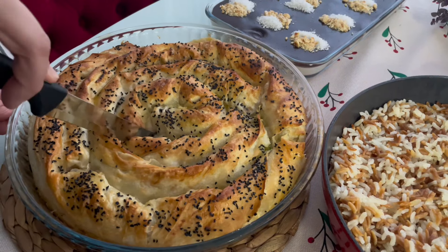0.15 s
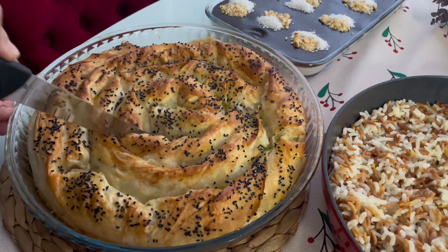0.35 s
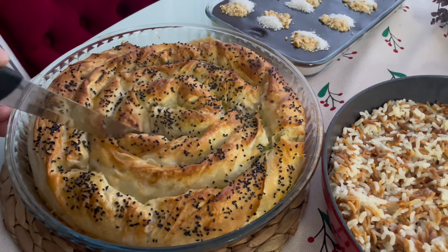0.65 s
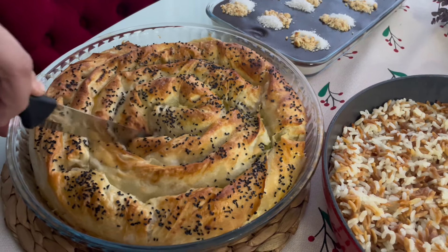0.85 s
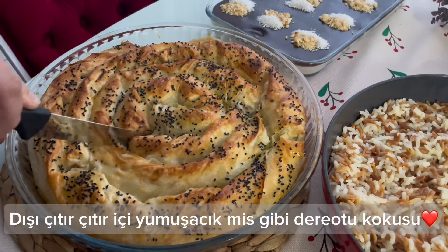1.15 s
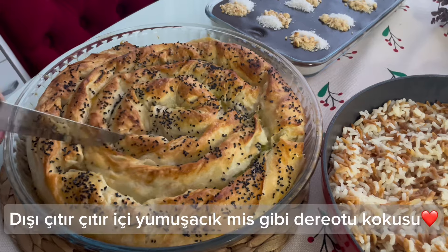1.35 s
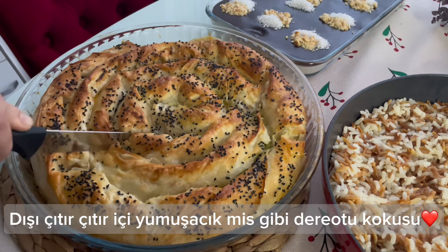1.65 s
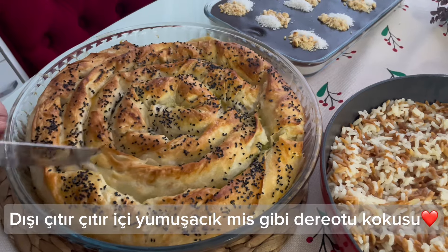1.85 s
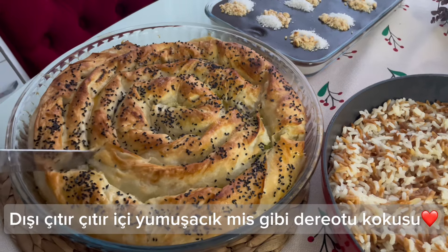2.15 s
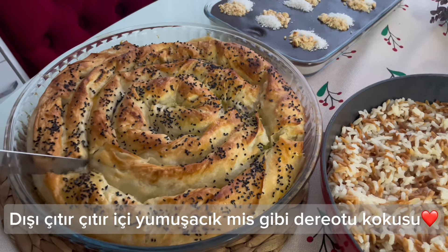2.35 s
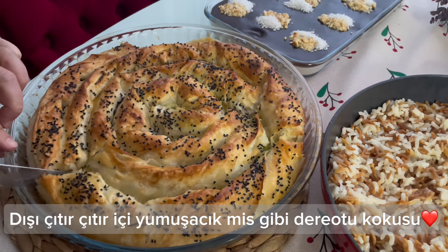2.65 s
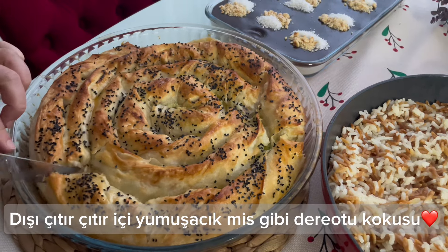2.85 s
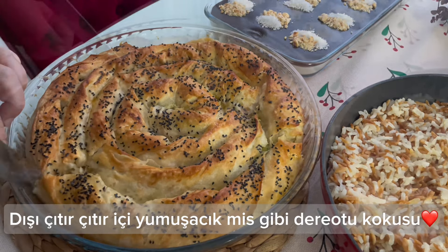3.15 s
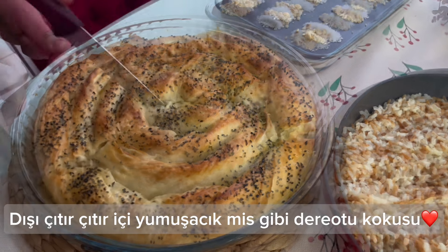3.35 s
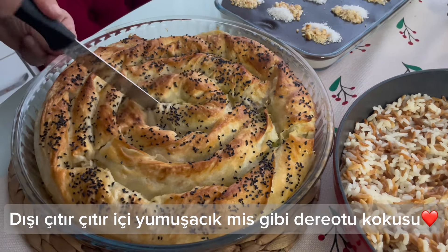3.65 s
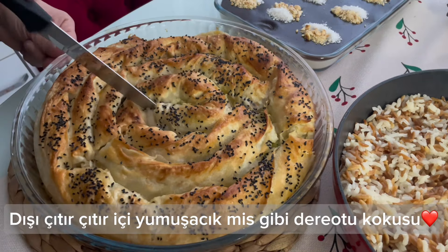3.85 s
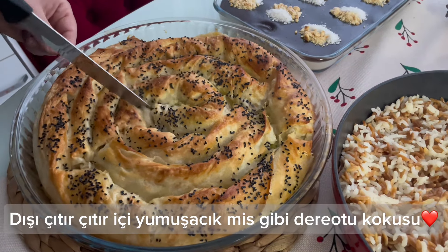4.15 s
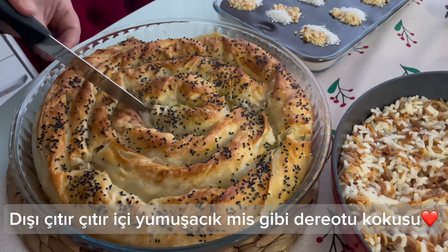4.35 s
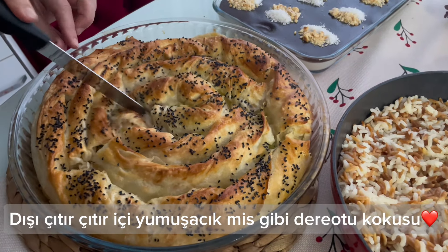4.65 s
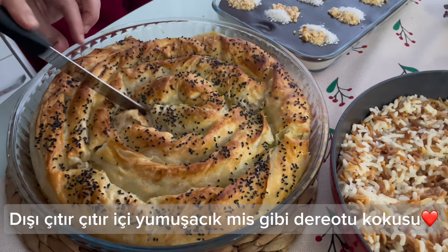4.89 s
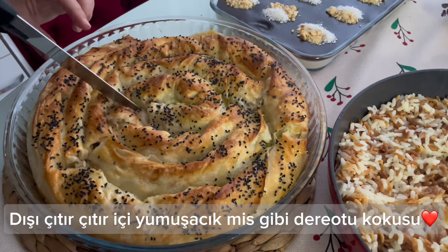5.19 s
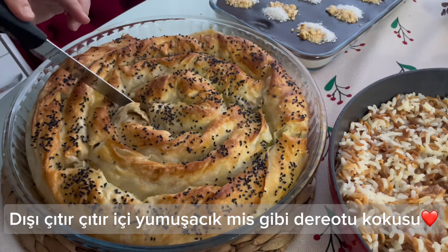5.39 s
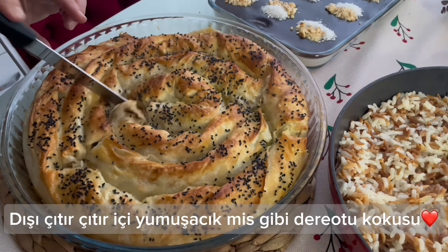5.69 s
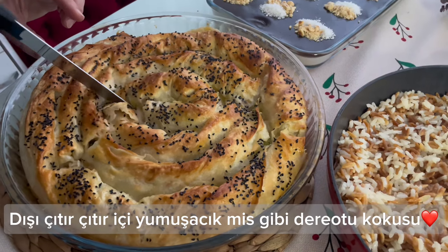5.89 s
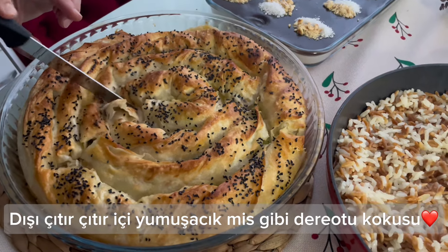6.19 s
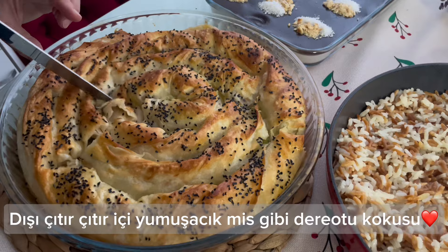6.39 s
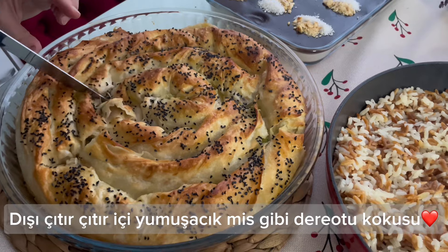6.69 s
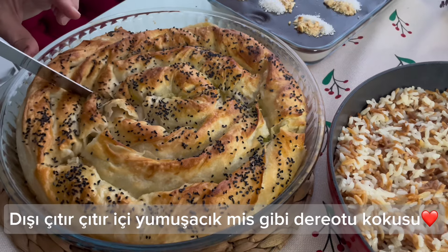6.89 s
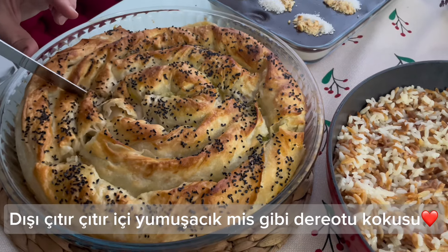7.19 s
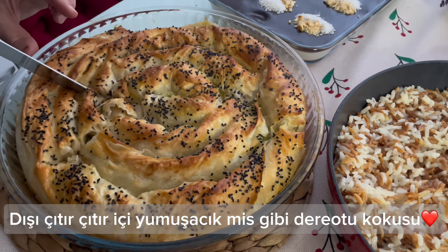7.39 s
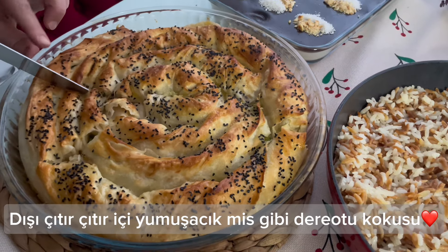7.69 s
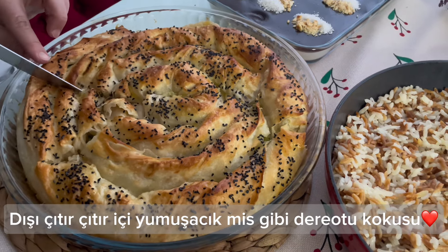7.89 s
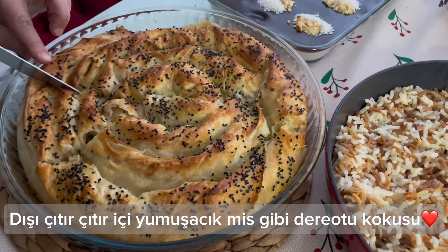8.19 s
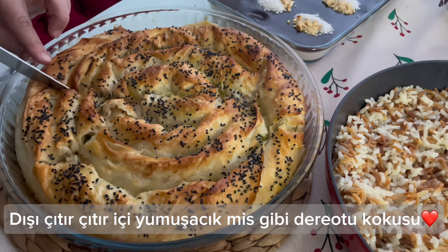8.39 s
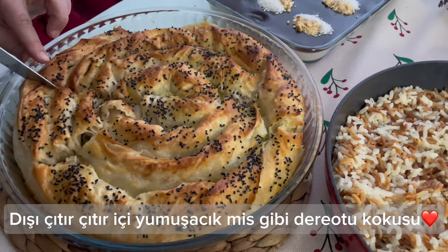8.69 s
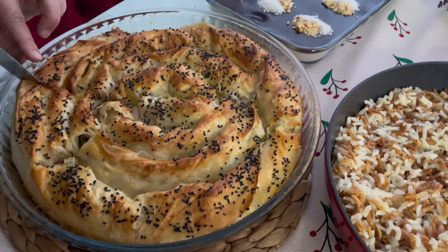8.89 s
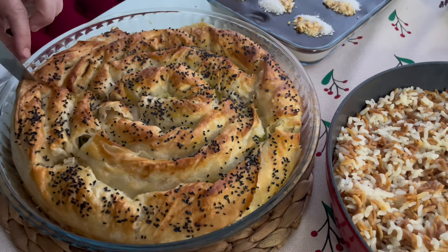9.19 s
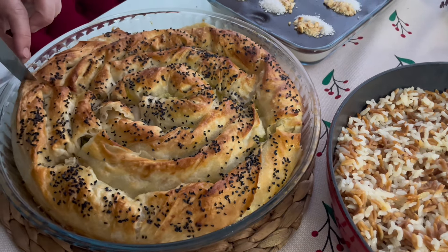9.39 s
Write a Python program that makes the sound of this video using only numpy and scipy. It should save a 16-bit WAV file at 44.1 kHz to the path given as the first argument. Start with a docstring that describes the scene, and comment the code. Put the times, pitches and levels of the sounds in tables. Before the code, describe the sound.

Close, dry crunching as a blade cuts flaky baked pastry in short paired strokes, thudding against a glass dish in a quiet small kitchen.

```python
"""A long knife saws through crisp layered pastry in a glass dish on a kitchen table, close to two microphone ports.
Strokes are crackle noise shaped by blade speed, with bursts of small flakes; large flakes snap as short noise bursts.
The blade knocks on the dish as falling chirps with steel ring and table boom; at the rim it chatters and clinks as
damped modes plus gritty noise, and light tip taps ring the dish. A small room answers over faint air and mains hum."""
import sys
import numpy as np
from scipy import signal
from scipy.fft import rfft, irfft, next_fast_len
from scipy.io import wavfile
from scipy.ndimage import uniform_filter1d, map_coordinates

SR = 44100
rng = np.random.default_rng(int(sys.argv[2]) if len(sys.argv) > 2 else 0)


def wav_out(sig):
    """Save sig, one row per channel (or a flat mono array), as 16-bit PCM at SR to the path in sys.argv[1]."""
    wavfile.write(sys.argv[1], SR, np.round(np.clip(np.atleast_2d(sig).T, -1, 1) * 32767).astype(np.int16))


N = 420713

# time axis of a short sound in seconds, contact at 0; AGE is the time since contact
HIT = np.arange(-512, 7680) / SR
AGE = np.maximum(HIT, 0)
HIT_HZ = np.fft.rfftfreq(len(HIT), 1 / SR)

# Saw cycles, a draw back then a push. Each row: push start in seconds, draw length in seconds,
# push length in seconds, draw level in dB, push level in dB.
STROKES = [(0.074, 0.067, .14, -52, -44), (.419, .14, .11, -52.5, -40), (0.741, .14, 0.13, -48.5, -43),
           (1.073, 0.14, 0.13, -49.5, -46.5), (1.489, 0.21, 0.13, -56, -53), (1.96, 0.28, .14, -63, -47),
           (2.391, 0.22, 0.098, -47.5, -52), (2.729, 0.16, .11, -50, -43), (3.201, 0.12, .11, -58, -43),
           (3.537, 0.15, .13, -48, -47), (3.853, 0.15, 0.15, -55, -49), (4.186, 0.18, 0.13, -56.5, -48),
           (4.497, 0.14, 0.14, -55, -53), (4.81, 0.12, 0.14, -52.5, -53), (5.264, 0.15, 0.11, -59, -50.5),
           (5.66, .18, 0.062, -60.5, -48), (6.035, .19, 0.13, -60.5, -50), (6.405, 0.17, .14, -53.5, -51.5),
           (6.772, 0.17, .14, -56.5, -48.5), (7.159, 0.15, 0.17, -55.5, -50),
           (7.552, 0.15, 0.13, -50, -47.5), (7.975, 0.29, .12, -55.5, -54.5),
           (8.309, 0.13, .12, -54.5, -57), (8.579, 0.1, 0.1, -50.5, -58.5), (8.974, 0.046, 0.1, -66, -54),
           (9.457, 0.12, 0.23, -53, -55)]
# Crust along the cut. Each row: time in seconds, hollow body offset in dB, dry fizz offset in dB.
PASTRY = [(0, -0.5, -6), (.7, -3, 0), (1.2, 6.5, -9.5), (2.2, -1, -5.5), (2.8, 5, -20), (3.3, 2.5, -17),
          (3.85, -5, -10.5), (4.4, 6, -5.5), (5.6, 2, -6), (6.1, 1.5, -10), (6.8, 5, -4.5), (7.6, 7.5, -3),
          (8.3, 3.5, -5), (8.55, -0.5, -22), (9, 4, -9), (9.4, -13, -19)]
# Spectrum of the crumbling crust. Each row: frequency in Hz, relative level in dB per Hz.
CRUST_SPECTRUM = [(47, -53), (80, -4.5), (163, 2), (436, -3), (744, 7.5), (1110, 0.5), (1810, -6),
                  (1980, -15), (5290, -18.5), (6470, -26), (7230, -68.5), (8450, -30), (9660, -29.5),
                  (12600, -34.5), (16500, -64)]
# Spectrum of small flakes inside the cut. Each row: frequency in Hz, relative level in dB.
CRUMB_SPECTRUM = [(200, -20.5), (800, 0.5), (1800, -10), (3200, 4.5), (5500, -11.5), (7500, -9.5),
                  (11000, -2), (14000, -17), (16500, -23)]
TURN_S = .018  # rest between draw and push
DRAW_CREST, PUSH_CREST = 0.35, 0.45  # moment of top speed, share of the stroke
USUAL_DB = -52.5  # rasp of an ordinary stroke
DRAW_RUB_DB, PUSH_RUB_DB = -55, -49  # the push bears down harder on the soft dough
RUB_EASES_DB_PER_S = .5  # the dough gives way as the cut deepens
RUB_GROWS, BODY_GROWS = 0.77, 0.87  # dB per dB of rasp


def sawing(swell=1.25, flakes_db=-11):
    """The blade speeds up and stops in each stroke; the crust crumbles in step with its speed."""
    t = np.arange(N) / SR
    drive, pressure = np.zeros((4, N)), np.zeros(N)
    place_s, hollow_db, dry_db = np.transpose(PASTRY)
    draws = [(s - TURN_S - length, length, DRAW_CREST, db, DRAW_RUB_DB) for s, length, _, db, _ in STROKES]
    pushes = [(s, length, PUSH_CREST, db, PUSH_RUB_DB) for s, _, length, _, db in STROKES]
    for start, length, crest, rasp_db, rub_db in draws + pushes:
        end, top = start + length, start + crest * length
        on = (t > start) & (t < end)
        speed = np.abs(np.sin(np.pi * np.interp(t[on], [start, top, end], [0, .5, 1]))) ** swell
        effort_db = rasp_db - USUAL_DB
        dough_db = rub_db + RUB_GROWS * effort_db - RUB_EASES_DB_PER_S * top
        body_db = USUAL_DB + BODY_GROWS * effort_db + np.interp(top, place_s, hollow_db)
        fizz_db = rasp_db + np.interp(top, place_s, dry_db)
        drive[:, on] += amp([dough_db, body_db, rasp_db, fizz_db])[:, None] * speed
        pressure[on] = amp(rasp_db)

    crumbs = crackle(rate_hz=2600, scatter_db=4.5) + 0.32 * rng.standard_normal(N)
    zones = filtered(patchy(crumbs, depth_db=3.0), crust_zones)
    catch_db = 2.12 * wobble(130) + 1.4 * wobble(40)  # the edge catches layer after layer
    brittle = [.35, .6, 1, 1.15]  # dry crust catches more than soft dough
    rasp = np.zeros(N)
    for level, share, zone in zip(drive, brittle, zones):
        rasp += level * unit(zone * amp(share * catch_db))

    # small flakes give way under pressure, each in a brief burst
    breaks = np.abs(crackle(rate_hz=70, scatter_db=8.5))
    bursts = signal.fftconvolve(breaks, decay(t60_s=0.0065, attack_s=.0005))[:N]
    flakes = unit(filtered(bursts * rng.standard_normal(N), lambda hz: amp(along(CRUMB_SPECTRUM, hz))))
    return rasp + amp(flakes_db) * pressure * flakes


def crust_zones(hz):
    """Soft dough, hollow body, rasp and fizz each own a part of the crust spectrum."""
    edges = [0 * hz, below(hz, 430), below(hz, 1900), below(hz, 7400), 1 + 0 * hz]
    return np.diff(edges, axis=0) * amp(along(CRUST_SPECTRUM, hz))


def crackle(rate_hz, scatter_db):
    """Tiny fractures at random moments, with log-normal sizes; rms 1."""
    breaks = rng.random(N) < rate_hz / SR
    return unit(breaks * rng.choice([-1, 1], N) * amp(scatter_db * rng.standard_normal(N)))


def patchy(x, depth_db):
    """Hollows in the crust colour the sound differently from moment to moment."""
    z = signal.stft(x, nperseg=512)[2]
    field = uniform_filter1d(rng.standard_normal(z.shape), size=6, axis=0)
    field = uniform_filter1d(field, size=10, axis=1)
    return signal.istft(z * amp(depth_db * unit(field)), nperseg=512)[1][:N]


# Blade landings on the dish. Each row: time in seconds, level in dB, weight of the hand in dB.
KNOCKS = [(0.2, -44, 8), (0.505, -34.5, 13.5), (.833, -15, 1.5), (1.02, -29, -6), (1.147, -1.5, -1.5),
          (1.479, -30, -8.5), (1.548, -14, 1.5), (3.084, -16, 6), (3.307, -5.5, 6), (3.324, -5.5, 11),
          (3.946, -16, 1), (4.291, -20, 3.5), (4.602, -32, 3), (4.904, -21.5, 0.5), (5.362, -23, -4),
          (5.708, -16, -1), (6.113, -4.5, -2.5), (6.495, -4.5, -4.5), (6.881, -26.5, -1), (7.264, -20, -14),
          (8.066, -29, -10), (8.374, -28, -15), (9.127, -18.5, 7.5), (9.385, -17.5, 14)]
# Spectrum of the blow. Each row: frequency in Hz, relative level in dB.
KNOCK_SPECTRUM = [(60, -30.5), (150, -5), (300, -13.5), (450, -10), (610, 1.5), (830, -10), (1130, 1.5),
                  (1550, -5.5), (2050, -23.5), (3300, -17), (5600, -6), (7200, -42), (10000, -20),
                  (16000, -50)]
# Spectrum of the table top. Each row: frequency in Hz, relative level in dB.
BOOM_SPECTRUM = [(25, -24), (55, 0), (110, -2.5), (170, -4.5), (240, 4), (330, -23), (800, -58.5),
                 (16000, -120)]
# Modes of steel on glass, also played by clinks. Each row: frequency in Hz, level in dB, undamped t60 in seconds.
BLADE_MODES = [(413, -2, 0.074), (558, -8.5, 0.13), (1055, -0.5, 0.12), (1150, -2.5, 0.061),
               (1270, -7.5, .08), (1350, -0.5, 0.043), (1457, -2, 0.076), (1790, -4.5, .2),
               (1900, -25, 0.099), (2230, -3, 0.097), (2394, 0, 0.033), (2474, -1, 0.12), (2788, -5, 0.088),
               (3256, 1.5, 0.1), (3350, -0.5, 0.1), (3566, 3.5, 0.038), (3900, -16.5, 0.048),
               (3930, -2, 0.033), (4100, -20.5, .07), (5010, 6.5, 0.058), (4860, -4, 0.047),
               (5156, 7.5, 0.031), (5800, -9.5, .04), (6060, -8.5, 0.056), (6070, -1.5, 0.055)]
USUAL_KNOCK_DB = -17
THUD_GROWS, STEEL_GROWS, BOOM_GROWS = 0.61, 0.9, 0.11  # dB per dB of knock: harder is brighter
BOOM_SHARE = .7  # share of the hand's weight that reaches the table
BOOM_DEEPENS = .05  # octaves per dB of weight


def knocks(travel_s=0.002491, lead_s=0.0017, thud_db=-28, tick_db=-34, ring_db=-40, boom_db=-38, boom_t60_s=0.077):
    """Bending waves carry the treble ahead of the bass, so each knock is a fast falling chirp."""
    out = np.zeros(N + SR)
    low, mid = below(HIT_HZ, 576), below(HIT_HZ, 2400)
    for s, db, weight in KNOCKS:
        force = db - USUAL_KNOCK_DB
        thud = weight + THUD_GROWS * force
        steel = STEEL_GROWS * force
        boom = BOOM_SHARE * weight + BOOM_GROWS * force
        path, pitch = rng.normal(1, [.1, .035])  # the blade never lands twice on the same spot
        bend = 2 * travel_s * path * np.sqrt(HIT_HZ * 1000)  # phase in cycles; travel_s * path = delay at 1 kHz
        chirp = np.exp(-2j * np.pi * (bend - HIT[0] * HIT_HZ))
        blow = amp(along(KNOCK_SPECTRUM, HIT_HZ * pitch)) * chirp
        add(out, s - lead_s, voiced(blow, [low, mid - low, 1 - mid], [thud + thud_db, db, steel + tick_db]))
        # the dough holds and damps the blade
        steel_ring = rfft(ring(BLADE_MODES, damping=1.6, attack_s=0.00038, detune=0.014))
        add(out, s, voiced(steel_ring, [1 - mid], [steel + ring_db]))
        push = rfft(rng.standard_normal(len(HIT)) * decay(boom_t60_s, attack_s=0.00043))
        table = amp(along(BOOM_SPECTRUM, HIT_HZ * 2 ** (BOOM_DEEPENS * weight)))
        add(out, s + 0.0021, voiced(push, [table], [boom + boom_db]))
    return out[:N]


# Chatter of the blade on the rim. Each row: time in seconds, number of catches, dull level in dB,
# bright level in dB, change per catch in dB, dull ring centre in Hz, bright ring centre in Hz.
CLINKS = [(2.6844, 1, -15, -21, 0, 1600, 3330), (2.767, 5, -23.5, -38, 1, 1150, 3460),
          (2.9496, 6, -12, -17, -2.46, 1230, 3780), (3.0704, 2, -28.5, -36, 9, 1150, 3270),
          (3.1851, 1, -14.5, -13, 10, 1300, 3540), (3.2183, 4, -18.5, -27, -3, 1310, 4050),
          (3.298, 2, -21, -26, 3, 1400, 2190), (3.3604, 1, -28, -24.5, 0, 1500, 5600),
          (3.442, 4, -18, -20, -3.5, 1440, 4750), (3.5866, 2, -22.5, -28.5, -4.5, 1180, 4870),
          (8.613, 2, -24.5, -35, -8.5, 1240, 2550), (8.653, 1, -39.5, -52, 8, 1190, 2370),
          (8.7734, 4, -21, -22.5, -1.75, 1370, 2550), (8.926, 2, -41, -46, -1, 1500, 2400),
          (8.991, 1, -52, -39, 0, 1800, 5050), (9.2538, 2, -56, -43, 2, 1500, 5030),
          (9.339, 2, -46, -35, -16, 1500, 5150), (9.364, 1, -40, -29, 0, 1500, 5230),
          (9.468, 2, -48, -39, -9, 1470, 5100)]
# Grit of steel on glass. Each row: frequency in Hz, relative level in dB.
SKID_SPECTRUM = [(100, 5.5), (700, -2.5), (1300, 15.5), (2200, 7.5), (6000, -4), (7500, -17), (11000, -9),
                 (16000, -45)]
PRESSED_DAMPING, FREE_DAMPING = 2.17, 2  # the rim damps the blade until the last catch lets it go
CHATTER_S, CHATTER_JITTER_S, CHATTER_SCATTER_DB = .0125, .001, 2.5  # from one catch to the next
DULL_WIDTH_HZ, BRIGHT_WIDTH_HZ = 250, 870  # reach of the modes one contact point favours


def clinks(dull_db=-1, bright_db=1, grit=1.3, grit_t60_s=0.043, graze_db=-20, focus_db=5):
    """Steel skids on the rim: it grazes, bites with a gritty contact and rings, then slips and may catch again."""
    out = np.zeros(N + SR)
    split = below(HIT_HZ, 1850, order=12)
    graze = np.exp(-(HIT / 0.006) ** 2)
    bite = decay(grit_t60_s, attack_s=0.0005) + amp(graze_db) * graze
    for s, count, dull, bright, change_db, dull_hz, bright_hz in CLINKS:
        near_dull = np.exp(-((HIT_HZ - dull_hz) / DULL_WIDTH_HZ) ** 2)
        near_bright = np.exp(-((HIT_HZ - bright_hz) / BRIGHT_WIDTH_HZ) ** 2)
        favoured = amp(focus_db * (near_dull + near_bright))  # the contact point picks the modes
        for k in range(round(count)):
            damping = FREE_DAMPING if k == round(count) - 1 else PRESSED_DAMPING
            steel = rfft(ring(BLADE_MODES, damping, attack_s=0.0006, detune=0.005))
            skid = rfft(grit * bite * rng.standard_normal(len(HIT))) * amp(along(SKID_SPECTRUM, HIT_HZ))
            catch = voiced((steel + skid) * favoured, [split, 1 - split], [dull + dull_db, bright + bright_db])
            # only catches after the first stray at random in time and level
            late_s, stray_db = min(k, 1) * rng.standard_normal(2) * [CHATTER_JITTER_S, CHATTER_SCATTER_DB]
            add(out, s + k * CHATTER_S + late_s, amp(k * change_db + stray_db) * catch)
    return out[:N]


# Large flakes. Each row: time in seconds, crack level in dB, treble level in dB.
SNAPS = [(0.6015, -27.5, -29), (0.7595, -26.5, -30), (.798, -27.5, -21.5), (.9133, -38, -29.5),
         (.9466, -31.5, -29), (0.965, -24.5, -23.5), (1.116, -24.5, -34), (1.1431, -24, -27),
         (1.286, -34.5, -44), (1.3308, -29, -36), (1.3951, -31.5, -44), (1.4785, -51, -41),
         (1.517, -37, -34), (1.9726, -46, -35), (1.9885, -37, -32), (2.3272, -37, -62), (6.7406, -24, -30),
         (6.7914, -33, -31.5), (6.8364, -23.5, -27), (6.847, -19, -32), (7.1907, -30.5, -33),
         (7.5718, -32, -44), (7.6183, -25.5, -30), (7.7533, -22, -33.5), (8.3526, -30, -40),
         (8.5042, -22.5, -18), (8.5649, -27.5, -43), (8.9898, -27.5, -38), (9.0329, -30.5, -33),
         (9.2245, -43, -42)]
# Spectrum of a breaking flake. Each row: frequency in Hz, relative level in dB.
FLAKE_SPECTRUM = [(200, -15), (800, -2), (2000, -6.5), (3300, -2.5), (5500, -4), (7500, -11), (10000, 4.5),
                  (13000, -2.5), (16000, -21.5)]
BASE_LEAD_S, BASE_CRACK_DB, BASE_TREBLE_DB = 0.0022, -15, -34.5  # bottom crust, relative to the knock level


def snaps(t60_s=0.0027):
    """A brittle flake breaks within a few milliseconds; so does the bottom crust before each knock."""
    out = np.zeros(N + SR)
    split = below(HIT_HZ, 7900)
    base = [(s - BASE_LEAD_S, db + BASE_CRACK_DB, db + BASE_TREBLE_DB) for s, db, _ in KNOCKS]
    for s, crack_db, treble_db in SNAPS + base:
        burst = rfft(rng.standard_normal(len(HIT)) * decay(t60_s, attack_s=0.0012))
        flake = burst * amp(along(FLAKE_SPECTRUM, HIT_HZ))
        add(out, s, voiced(flake, [split, 1 - split], [crack_db, treble_db]))
    return out[:N]


# Light taps of the knife tip. Each row: time in seconds, level in dB.
TAPS = [(1.718, -25), (2.488, -30)]
# Modes of the dish. Each row: frequency in Hz, level in dB, undamped t60 in seconds.
DISH_MODES = [(181, -1, 0.12), (592, -5.5, 0.18), (1010, -26, 0.13), (1200, -6, 0.1), (1540, -15.5, 0.068),
              (2600, -10.5, 0.044), (3350, -17.5, 0.043)]


def taps(tap_db=1):
    """The tip touches the dish and lets its damped modes ring."""
    out = np.zeros(N + SR)
    for s, db in TAPS:
        sound = ring(DISH_MODES, damping=1.96, attack_s=0.00044, detune=0.0018)
        add(out, s, peaked(sound, db + tap_db))
    return out[:N]


# Unequal scatter of the dishes. Each row: frequency in Hz, level in dB.
SCATTER = [(60, -16), (200, -18), (500, -10), (1200, -11), (2500, -5), (5000, -5), (12000, -6)]


def scattered(x, t60_s=0.022):
    """Dishes around the knife throw its sound at the two ports with opposite sign."""
    age = AGE[512:]
    bounce = rng.standard_normal(len(age)) * amp(-60 * age / t60_s)
    side = signal.fftconvolve(x.mean(axis=0), bounce / np.linalg.norm(bounce))[:N]
    return np.array([[1], [-1]]) * filtered(side, lambda hz: amp(along(SCATTER, hz)))


# Phase slip between the ports. Each row: frequency in Hz, signed side-over-mid ratio.
SPREAD = [(60, 0), (300, 0), (600, .2), (1200, .25), (2000, .65), (2700, -.6), (3200, .4), (4500, .3),
          (5100, 0), (6000, -1.3), (7600, -3.5), (9400, -0.4), (10000, .1), (12500, 0.75), (16000, 1.6)]


def two_ports(x):
    """Opposite quadrature parts turn the phase apart between the ports."""
    return filtered(x, lambda hz: 1 + np.array([[1j], [-1j]]) * along(SPREAD, hz))


# Decay of the room tail. Each row: frequency in Hz, t60 in seconds.
ROOM = [(100, 0.75), (400, 0.39), (1200, 0.33), (4000, 0.3), (12000, 0.11)]


def kitchen(x, early_db, tail_db, early_t60_s, apart=0.9, apart_hz=450):
    """Table and dishes answer briefly, the walls with a longer tail, both from 2.5 ms on; the ports share part."""
    size = SR // 2
    # long waves reach both ports alike
    highpass = signal.butter(1, apart_hz, 'highpass', fs=SR, output='sos')
    own = signal.sosfilt(highpass, rng.standard_normal((2, 2, size)))
    near, far = rng.standard_normal((2, 1, size)) + apart * own
    hz, t, z = signal.stft(far, SR, nperseg=256)
    fading = z * amp(-60 * t / along(ROOM, hz)[:, None])
    tail = signal.istft(fading, SR, nperseg=256)[1][:, :size]
    early = near * amp(-60 * np.arange(size) / SR / early_t60_s)
    answer = amp(early_db) * early / np.linalg.norm(early[0])
    answer = answer + amp(tail_db) * tail / np.linalg.norm(tail[0])
    delayed = np.pad(x, (round(.0025 * SR), 0))
    return x + signal.fftconvolve(delayed[None], answer, axes=1)[:, :N]


# Spectrum of the room tone. Each row: frequency in Hz, relative level in dB per Hz.
AIR_SPECTRUM = [(15, -29), (25, -21.5), (65, 6.5), (457, -7), (746, -11), (1780, -17), (1980, -24),
                (5130, -27), (7300, -45.5), (9080, -33.5), (11600, -32.5), (15200, -60.5), (16500, -42.5)]


def room_tone(air_db=-57.0, hum_db=-60):
    """Still air as shaped noise, mostly shared by the ports, and a wavering 50 Hz mains hum."""
    noise = rng.standard_normal(N) + 0.25 * rng.standard_normal((2, N))
    air = unit(filtered(noise, lambda hz: amp(along(AIR_SPECTRUM, hz))))
    hum = amp(hum_db + wobble(3.7)) * np.sqrt(2) * np.sin(2 * np.pi * 50 * np.arange(N) / SR)
    return amp(air_db) * air + hum


def amp(db):
    """Decibels to gain."""
    return 10 ** (np.asarray(db) / 20)


def unit(x):
    """Scale to rms 1."""
    return x / np.sqrt(np.mean(x ** 2) + 1e-20)


def peaked(sound, db):
    """Scale to a peak level."""
    return amp(db) * sound / np.abs(sound).max()


def along(points, hz):
    """(Hz, value) points read on a log axis."""
    f, v = np.transpose(points)
    return np.interp(np.log(hz + 1), np.log(f + 1), v)


def wobble(rate_hz):
    """A smooth random curve, rate_hz knots a second."""
    knots = rng.standard_normal(int(N * rate_hz / SR) + 4)
    return map_coordinates(knots, [np.arange(N) * rate_hz / SR])


def filtered(x, response):
    """x times a response of frequency."""
    m = next_fast_len(N + 8192)
    return irfft(rfft(x, m) * response(np.fft.rfftfreq(m, 1 / SR)), m)[..., :N]


def below(hz, edge_hz, order=8):
    """Low-pass gain; one minus it is the matching high-pass."""
    return 1 / (1 + (hz / edge_hz) ** order)


def decay(t60_s, attack_s):
    """Envelope of a contact: a quick rise and an exponential fall."""
    return amp(-60 * AGE / t60_s) * (1 - np.exp(-AGE / attack_s))


def ring(modes, damping, attack_s, detune):
    """Modes struck at new strengths every time; grip and contact point shift them slightly."""
    hz, db, t60_s = np.transpose(modes)[:, :, None]
    strength_db = rng.normal(0, 2.3, hz.shape)
    phase = rng.uniform(0, 2 * np.pi, hz.shape)
    shift = rng.normal(1, detune, hz.shape)
    envelope = decay(np.minimum(t60_s, .3) / damping, attack_s)
    return np.sum(amp(db + strength_db) * envelope * np.sin(2 * np.pi * hz * shift * AGE + phase), axis=0)


def voiced(spectrum, bands, levels_db):
    """A short sound whose bands each reach their own peak level."""
    parts = irfft(spectrum * np.array(bands))
    return amp(levels_db) @ (parts / np.abs(parts).max(axis=1, keepdims=True))


def add(track, s, sound):
    """Mix in a short sound whose contact falls at time s."""
    i = max(round((s + HIT[0]) * SR), 0)
    track[i:i + len(sound)] += sound


def scene():
    """All the knife's sounds in the room, at two ports that differ in phase, over the room tone."""
    knife = kitchen(sawing(), early_db=-9.5, tail_db=-12.0, early_t60_s=0.028)
    knife += kitchen(knocks() + taps(), early_db=-8.5, tail_db=-12.5, early_t60_s=0.074)
    rim_balance = amp([[.5], [-.5]])
    knife += kitchen(clinks(), early_db=-9.5, tail_db=-11.5, early_t60_s=0.089) * rim_balance
    knife += kitchen(snaps(), early_db=-12.5, tail_db=-17.5, early_t60_s=0.035)
    port_balance = amp([[.15], [-.15]])
    return (two_ports(knife) + scattered(knife)) * port_balance + room_tone()


def record(dry):
    """A very steep low-pass at the 16.4 kHz band limit."""
    return filtered(dry, lambda hz: below(hz, 16400, order=120))


dry = scene()
out = record(dry)
wav_out(out)
```